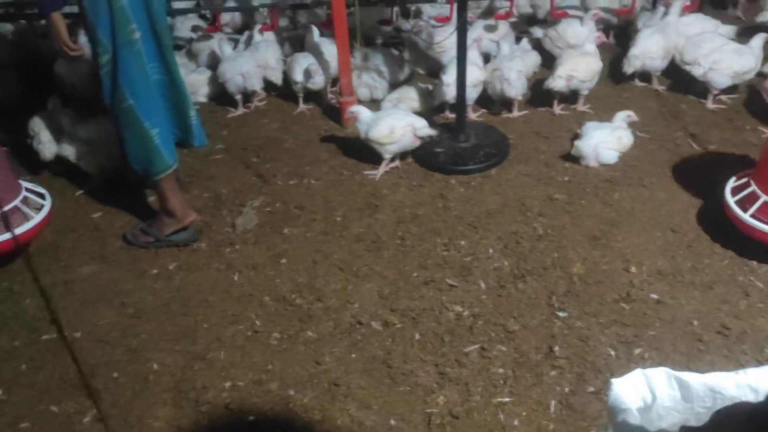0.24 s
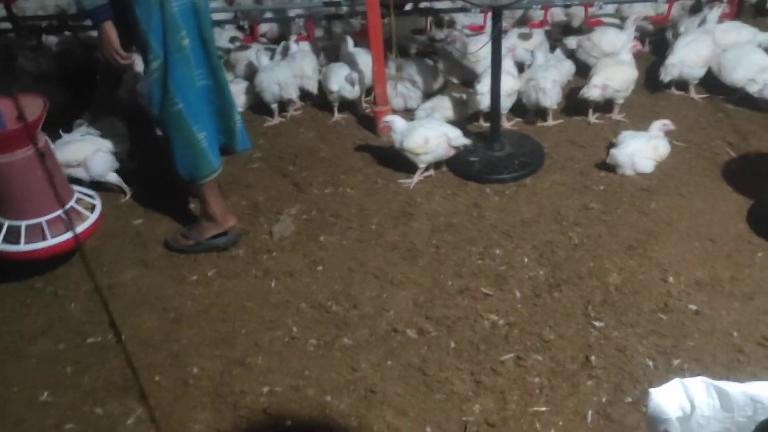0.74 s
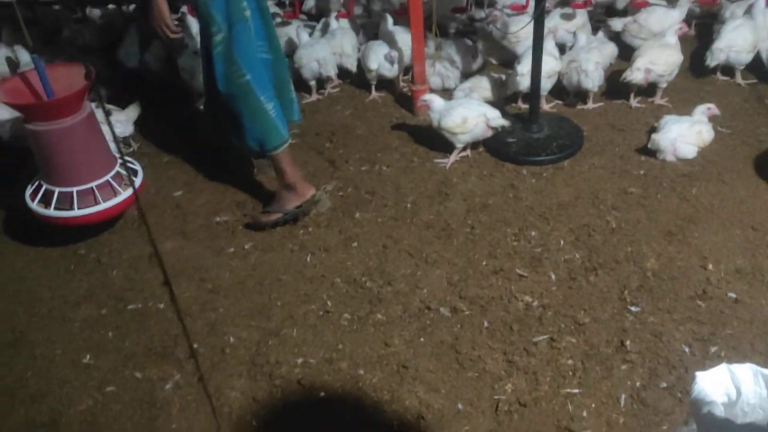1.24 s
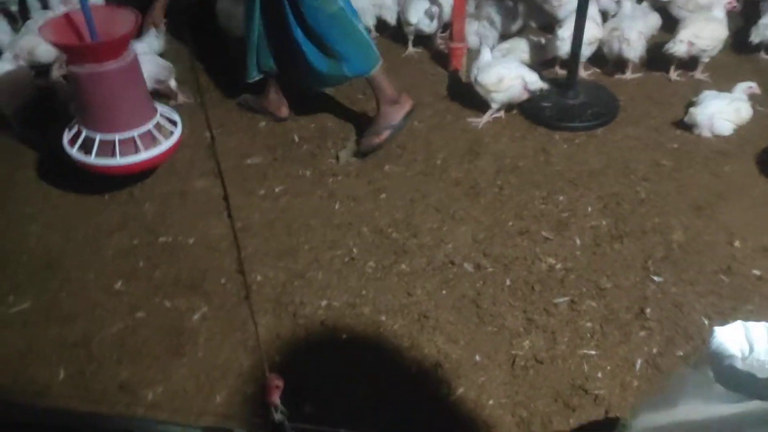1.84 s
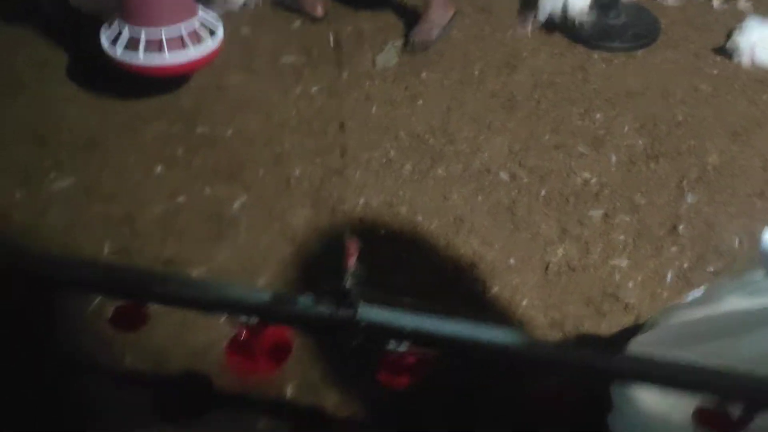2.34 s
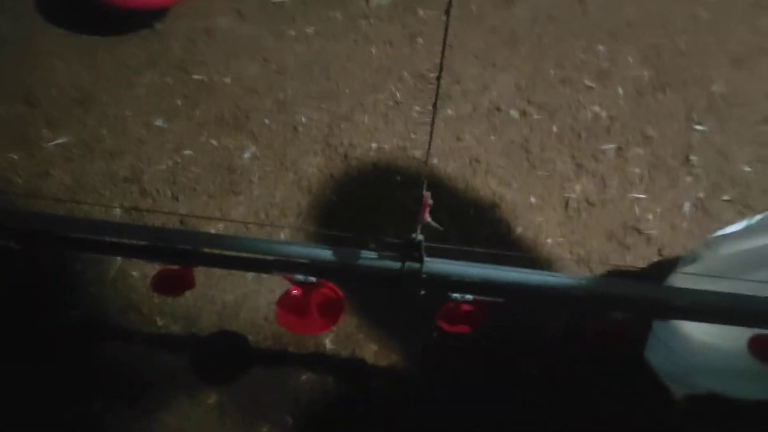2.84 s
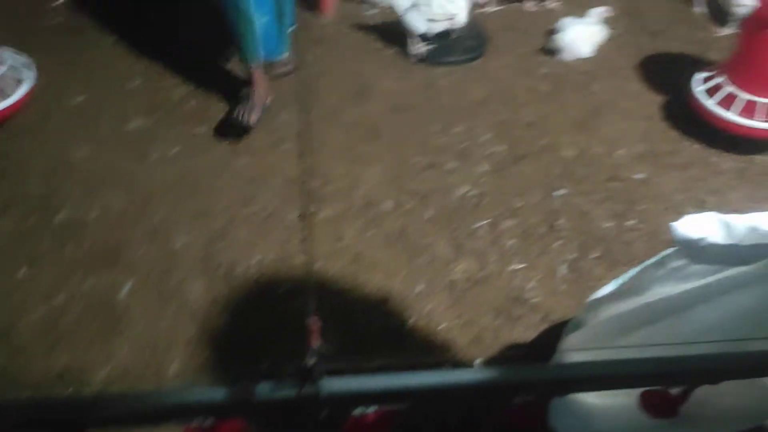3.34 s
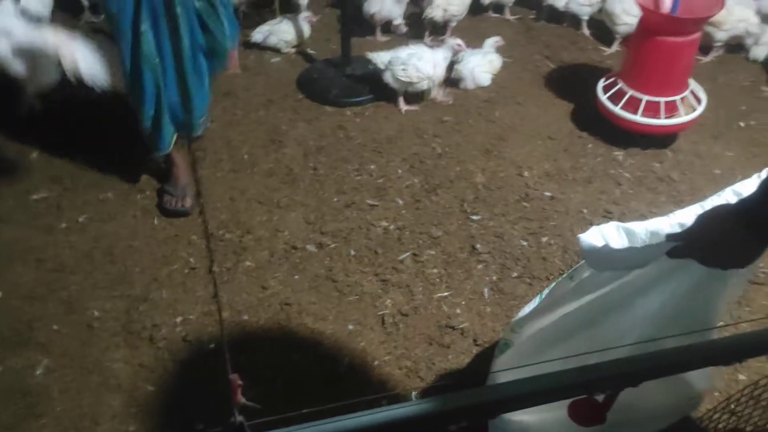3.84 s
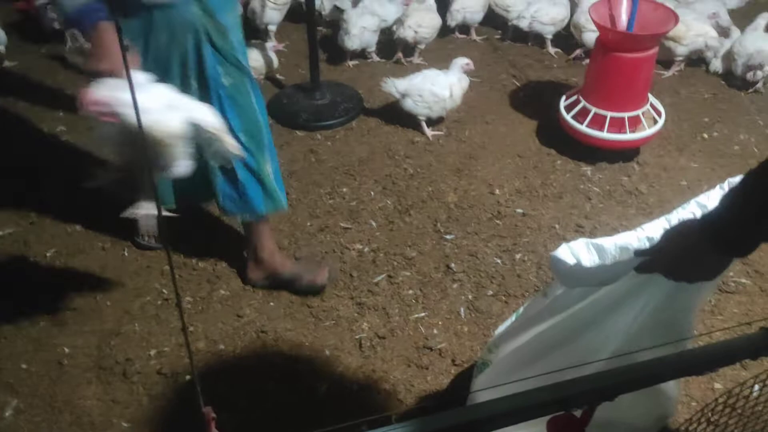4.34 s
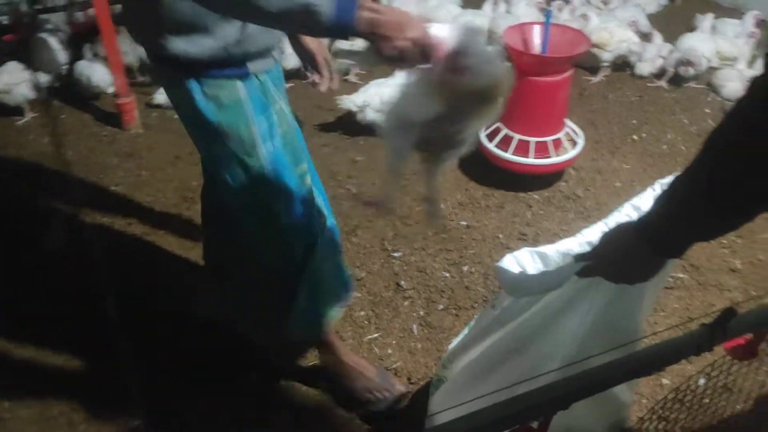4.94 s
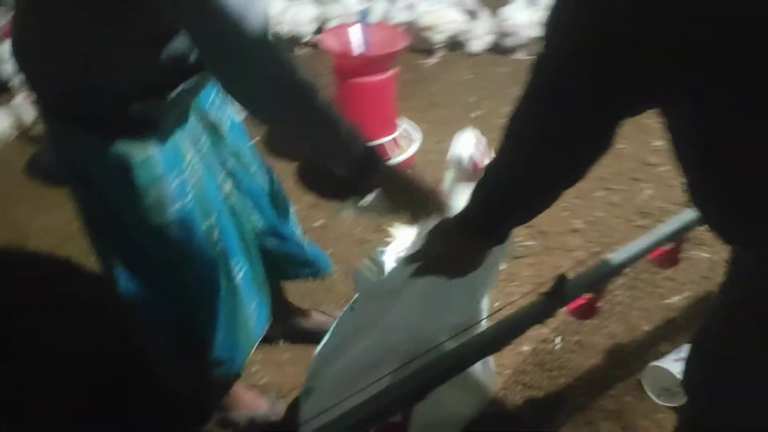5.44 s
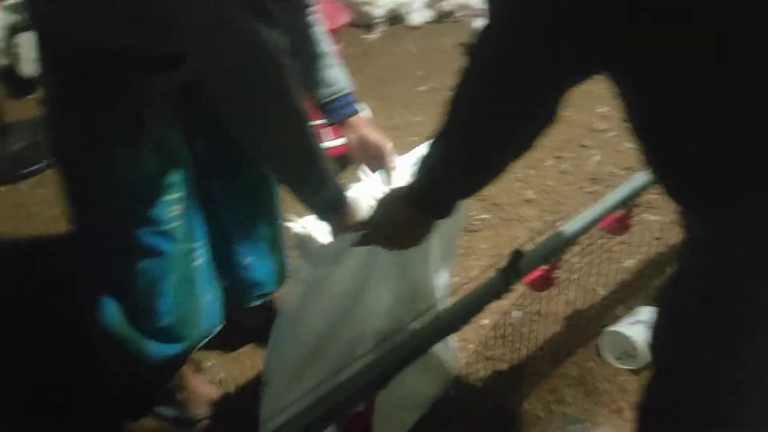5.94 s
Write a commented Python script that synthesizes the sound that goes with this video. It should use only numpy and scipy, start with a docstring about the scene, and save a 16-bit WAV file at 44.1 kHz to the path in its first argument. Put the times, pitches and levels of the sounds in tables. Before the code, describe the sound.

Short throaty chicken clucks and a few scuffing footsteps lead into loud, strained squawks near the microphone, with soft flock murmurs and hiss behind.

```python
"""Against a murmuring, peeping flock and a thin hiss under a low roof, a caught broiler clucks: a pulsed
syrinx source through throat and beak resonances. Puffs of air, dry rustles and a few footfalls (shaped noise,
falling sines) pass meanwhile. Carried up to a sack near the microphone, the bird then gives long squawks that
start as a rasp, lock into a clear tone and sag as the beak closes; a rustle and a last short cluck end it."""
import sys
import numpy as np
from scipy import signal
from scipy.fft import rfft, irfft
from scipy.io import wavfile

SR = 44100
rng = np.random.default_rng(int(sys.argv[2]) if len(sys.argv) > 2 else 0)


def master(y):
    """Save y as 16-bit WAV."""
    cut = np.clip(np.atleast_2d(y).T, -1, 1)
    pcm = np.round(cut * 32767)  # scale
    wavfile.write(sys.argv[1], SR, pcm.astype(np.int16))


N = 273420


def undb(db):
    """Decibels to gain."""
    return 10 ** (np.asarray(db) / 20)


def unit(x):
    """Scale to rms 1."""
    return x / np.sqrt(np.mean(x ** 2) + 1e-18)


def add(out, start_s, x):
    """Mix x into out from a start time on."""
    i = max(int(start_s * SR), 0)
    out[i:i + len(x)] += x[:max(len(out) - i, 0)]


def colour(points, hz):
    """Gain of a (Hz, dB) spectrum at the given frequencies."""
    f, db = np.transpose(points)
    return undb(np.interp(np.log(hz + 1), np.log(f), db))


def hump(hz, centre_hz, octaves):
    """Bell shape on a log-frequency axis, 1 at the centre."""
    return np.exp(-.5 * (np.log2((hz + 1) / centre_hz) / octaves) ** 2)


def band_noise(n, centre_hz, octaves):
    """Noise around one frequency, rms 1."""
    spectrum = rfft(rng.standard_normal(n))
    return unit(irfft(spectrum * hump(np.fft.rfftfreq(n, 1 / SR), centre_hz, octaves), n))


def walk(n, rate_hz):
    """Smooth chance with a spread near 1 that turns about rate_hz times a second."""
    steps = np.arange(n) * rate_hz / SR
    count = int(steps[-1]) + 2
    return 1.2207 * np.interp(steps, np.arange(count), rng.standard_normal(count))


def gate(t, start_s, end_s, attack_s, release_s):
    """Opens linearly at the start and dies away exponentially after the end."""
    return np.clip((t - start_s) / attack_s, 0, 1) * np.exp(-np.maximum(t - end_s, 0) / release_s)


def background(flicker_db=2, left_db=-1, level_db=-46):
    """Distant flock, rustle and hiss: half-octave noise bands that flicker, the treble least."""
    # Spectrum of the shed's background. Each row: frequency in Hz, relative density in dB per Hz.
    shed_colour = [(30, 3.5), (105, -14.5), (180, -1.5), (720, -7), (1000, -1.5), (1650, -7), (2350, -5.5),
                   (3300, -9), (6000, -16.5), (7100, -2), (8700, -9), (10200, -33.5), (15000, -29.5)]
    f, out = np.fft.rfftfreq(N, 1 / SR), np.zeros((2, N))
    # part of the noise is common to both channels
    noise = rng.standard_normal((2, N)) + 0.63 * rng.standard_normal(N)
    noise = rfft(noise) * colour(shed_colour, f)
    for hz in 30 * 2 ** (np.arange(19) / 2):
        band = irfft(noise * hump(f, hz, 1 / 4), N)
        out += band * undb(flicker_db * min(1, 3000 / hz) * walk(N, 14))
    return unit(out) * undb(level_db + np.array([[left_db], [-left_db]]) / 2)


def soft_call(length_s, first_hz, last_hz, waver=0.0412, overtone_db=-17):
    """A wavering glide with one strong partial and a weak octave."""
    n = int(length_s * SR)
    hz = np.geomspace(first_hz, last_hz, n) * (1 + waver * walk(n, 319.6))
    phase = 2 * np.pi * np.cumsum(hz) / SR
    return unit((np.sin(phase) + undb(overtone_db) * np.sin(2 * phase)) * np.hanning(n) ** .5)


def flock(length_s=0.0651, murmur_db=-49.0, peep_db=-58, count=110):
    """A few distinct calls over many random murmurs and peeps, all gliding tones."""
    # Other birds' calls. Each row: start in seconds, first pitch in Hz, last pitch in Hz, level before room in dB.
    distinct_calls = [(.59, 2590, 1980, -59), (1.498, 1577, 1850, -46), (.73, 1022, 904, -48),
                      (1.14, 2270, 1820, -50.5), (3.745, 1025, 917, -37), (4.109, 1126, 1055, -44),
                      (4.181, 2780, 2250, -58)]
    out = np.zeros(N)
    for start_s, first_hz, last_hz, db in distinct_calls:
        add(out, start_s, undb(db) * soft_call(length_s, first_hz, last_hz))
    for centre_hz, level_db in [(1020, murmur_db), (2250, peep_db)]:
        for turn, (when, size, pitch, loud) in enumerate(rng.random((count, 4))):
            start_s = (turn + 2 * when - 1) / count * N / SR
            hz = centre_hz * 2 ** (.5 * (pitch - .5))
            call = soft_call(length_s * (.5 + size), hz * 1.07, hz / 1.07)
            add(out, start_s, undb(level_db + 10 * (loud - .5)) * call)
    return out


def litter(centre_hz=6500, grain_db=5, scratch_db=-57, count=45):
    """Dry husks crackle: a few clear rustles over the scratching of many feet, as grainy noise."""
    # Rustles of litter and sack. Each row: start in seconds, length in seconds, level before room in dB.
    rustles = [(0.334, 0.018, -55), (1.5, .04, -45.5), (6.144, 0.006, -40)]
    out, t = np.zeros(N), np.arange(SR // 8) / SR
    scratches = [(when * N / SR, 0.032 * size, scratch_db + 10 * (loud - .5))
                 for when, size, loud in rng.random((count, 3))]
    for start_s, length_s, db in list(rustles) + scratches:
        grains = unit(band_noise(len(t), centre_hz, 0.38) * undb(grain_db * walk(len(t), 600)))
        add(out, start_s, undb(db) * grains * gate(t, 0, length_s, attack_s=.003, release_s=0.0096))
    return out


def puffs(right_db=-14):
    """Air brushing the left microphone port: short low rumbles, faint on the right."""
    # Each row: start in seconds, length in seconds, left level in dB.
    air_puffs = [(0.1, 0.065, -34), (2.122, 0.29, -48.5)]
    out = np.zeros(N)
    for start_s, length_s, db in air_puffs:
        n = int(length_s * SR)
        add(out, start_s, undb(db) * band_noise(n, 34.0, 1.56) * np.hanning(n) ** .5)
    return np.array([out, undb(right_db) * out])


def footfalls(thud_hz=205, bend=1.0, bend_s=0.0044, thud_s=0.0093, scuff_s=0.015, grit_db=3):
    """Sandals land on the packed litter with a hollow thud that drops in pitch, and scrape over it."""
    # Each row: start in seconds, relative thud level in dB, scuff centre in Hz, relative scuff level in dB.
    steps = [(0.916, -59, 430, -49.5), (1.925, -48, 500, -56), (2.287, -34.5, 890, -35.5),
             (2.797, -36, 580, -40), (3.482, -37.5, 1060, -36.5)]
    out, t = np.zeros(N), np.arange(SR // 6) / SR
    for start_s, thud_db, scuff_hz, scuff_db in steps:
        thud = np.sin(2 * np.pi * np.cumsum(thud_hz * (1 + bend * np.exp(-t / bend_s))) / SR)
        scuff = band_noise(len(t), scuff_hz, 0.59) * undb(grit_db * walk(len(t), 330))
        for sound, db, decay_s in [(thud, thud_db, thud_s), (scuff, scuff_db, scuff_s)]:
            add(out, start_s, undb(db) * sound * gate(t, 0, 0.015, attack_s=0.0034, release_s=decay_s))
    return out


def shed(x, near_db, far_db, near_s=0.011, t60_s=0.27, treble_t60_s=0.36):
    """Floor, feeders and bodies scatter the sound at once; roof and walls give a short tail."""
    t = np.arange(int(.7 * SR)) / SR
    # small things scatter short waves most
    near_highpass = signal.butter(4, 1400, "highpass", fs=SR, output="sos")
    far_lowpass = signal.butter(2, 3000, fs=SR, output="sos")
    ears = []
    for _ in range(2):
        near, far = rng.standard_normal((2, len(t)))
        near = signal.sosfilt(near_highpass, near * np.exp(-t / near_s) * (t > .0007))
        low = signal.sosfilt(far_lowpass, far)
        tail = low * 1000 ** (-t / t60_s) + 0.5 * (far - low) * 1000 ** (-t / treble_t60_s)
        tail = tail * (t > .012)
        response = (undb(near_db) * unit(near) + undb(far_db) * unit(tail)) / np.sqrt(len(t))
        ears.append(signal.fftconvolve(x, response)[:N])
    return np.array(ears)


def syrinx(hz, rasp, doubling=0.21, waver=0.00553, rough_waver=0.03415, jitter=.125, beat_db=4.0,
           shimmer_db=2.5, gating=0.88, dispersion=0.292, air_share=0.71):
    """Membranes beat regularly, alternate strong and weak or break into chaos; air escapes once a cycle."""
    n = len(hz)
    drift = (waver + rough_waver * rasp) * walk(n, 111.1) + jitter * rasp ** 1.678 * walk(n, 450)
    phase = 2 * np.pi * np.cumsum(hz * (1 + drift)) / SR
    k = np.arange(1, 27)[:, None]
    # the windpipe spreads each beat out in time
    tone = (np.cos(k * phase - dispersion * k ** 2) * (k * hz < SR / 2)).sum(0)
    tone = unit(tone * (1 + 2 * doubling * np.sqrt(rasp) * np.cos(phase / 2)))
    air = unit(rng.standard_normal(n) * (1 + gating * np.cos(phase)))
    leak = np.clip(air_share * rasp, 0, 1)
    # in chaos every beat has its own strength and beats come in uneven bursts; the air pulses with them
    beats = np.interp(phase / (2 * np.pi), np.arange(n), rng.standard_normal(n))
    uneven_db = rasp * (beat_db * (beats - .5) + shimmer_db * (walk(n, 258.0) - .5))
    return (np.sqrt(1 - leak ** 2) * tone + leak * air) * undb(uneven_db)


def voice(t, hz, rasp, low_db, middle_db, top_db, second_db, opened, open_hz, beak_hz, throat_db,
          throat_octaves, pitch_ring_db=10, twist_db=3.5):
    """Syrinx through throat and beak resonances that follow the gape; effort weights three registers."""
    # Colours of the clear and of the rasping voice. Each row: frequency in Hz, relative level in dB.
    clear_colour = [(100, -69), (430, -2), (600, 2.5), (950, -6), (1300, -1), (1900, -1.5), (2600, 5),
                    (3300, 1.5), (3850, 9), (4500, -9), (5500, -9), (8800, -13.5), (10600, -41),
                    (15000, -49)]
    rasp_colour = [(100, -48), (480, 1.5), (760, 5.5), (1120, 12), (1750, -6), (3000, -6.5), (3750, -8.5),
                   (4900, -13), (7300, 5.5), (9000, 1), (10500, -22), (15000, -29.5)]
    shut_hz, beak_ref_hz, beak_swing = 1150, 7684, 0.08
    rasp = np.clip(rasp, 0, 1)
    f, frames_s, source = signal.stft(syrinx(hz, rasp), SR, nperseg=384)
    controls = (hz, rasp, low_db, middle_db, top_db, second_db, opened, throat_db, throat_octaves)
    hz, rasp, low_db, middle_db, top_db, second_db, opened, throat_db, throat_octaves = (
        np.interp(frames_s, t - t[0], c + 0 * t) for c in controls)
    f = f[:, None]
    above_low, above_middle = (1 / (1 + (edge_hz / (f + 1)) ** 16) for edge_hz in (1600, 4800))
    # the treble colour slides with the beak resonance
    beak_now_hz = beak_hz * (1 - beak_swing * (1 - opened))
    slid_hz = f * (beak_ref_hz / beak_now_hz) ** above_middle
    tract = colour(clear_colour, slid_hz) ** (1 - rasp) * colour(rasp_colour, slid_hz) ** rasp
    throat_hz = shut_hz + (open_hz - shut_hz) * opened
    tract = tract * undb(throat_db * hump(f, throat_hz, throat_octaves))
    # even in chaos the membranes favour their own frequency
    ring_db = pitch_ring_db * (1 + rasp) / 2 * hump(f, hz, .15)
    tract = tract * undb(second_db * hump(f, 2 * hz, .15) + ring_db)
    # the struggling bird twists its neck, so partials swell and fade unevenly
    smoother = np.outer(np.hanning(8), np.hanning(12))
    twist = unit(signal.fftconvolve(rng.standard_normal(tract.shape), smoother, "same"))
    tract = tract * undb(twist_db * twist)
    registers = [(1 - above_low, low_db), (above_low - above_middle, middle_db), (above_middle, top_db)]
    gain = sum(share * undb(db) / np.sqrt(np.mean((share * tract) ** 2, axis=0)) for share, db in registers)
    return signal.istft(source * tract * gain, SR)[1][:len(t)]


def gape(t, widest_s, length_s, snap_s=0.023, snap_share=0.78):
    """Beak opening, 0-1: snaps most of the way open, widens on to widest_s, then shuts."""
    opens = snap_share * (1 - np.exp(-t / snap_s)) + (1 - snap_share) * np.minimum(t / widest_s, 1)
    shutting = np.clip((t - widest_s) / (length_s - widest_s), 0, 1)
    return opens * (.5 + .5 * np.cos(np.pi * shutting))


def catch(centre_hz, attack_s=0.0065, hold_s=0.012, release_s=0.018, db=-4.0):
    """The short, hollow puff with which the throat opens: narrow-band noise."""
    t = np.arange(SR // 10) / SR
    return undb(db) * band_noise(len(t), centre_hz, 1 / 5) * gate(t, 0, hold_s, attack_s, release_s)


def clucks(fall=0.17, closing_share=.35, strain=.08, strain_s=0.01035, lock_share=.35, shortest_s=.045,
           onset_rasp=0.708, end_rasp=0.26, top_slope=1.78, top_db=-2.0, opening_db=-7, opening_low_db=-11,
           closing_db=-6, closing_low_db=-3, attack_share=0.1, release_s=0.013, widest_share=0.52,
           throat_db=8, throat_octaves=0.34, beak_hz=7900, catch_db=2.5, catch_hz=900,
           catch_hz_per_s=7000, catch_db_per_s=90):
    """A hoarse catch locks into a tone that drops onto its pitch, then bends down as the beak shuts."""
    # Each row: start in seconds, length in seconds, pitch in Hz, rasp 0-1, low register in dB,
    # second partial lift in dB, brightness in dB, open throat resonance in Hz.
    short_calls = [(0.137, 0.041, 523.4, 0.57, -31, 3, -10, 1520),
                   (0.423, 0.047, 512.6, 0.61, -26.5, 4, -15, 1030),
                   (0.821, 0.06, 694, 0.97, -37, -3, -17, 1800),
                   (0.969, 0.048, 773, 0.5, -34, -14, -10.5, 2020),
                   (1.11, 0.04, 738.6, 0.32, -31, -14, -11, 1710),
                   (1.219, 0.052, 677.4, 0.41, -27.5, -8, -11.5, 1270),
                   (1.402, 0.05, 642.6, 0.25, -28, -4, -6.5, 1670),
                   (1.556, 0.06, 660, 0.35, -27.5, 1, -1, 1950), (1.703, 0.085, 695, 0.6, -26, 7, 0, 1720),
                   (1.885, 0.082, 681, 0.65, -26, 12, -1.5, 2560),
                   (2.002, 0.074, 524, 0.77, -30, 1.5, -5, 2420),
                   (2.118, 0.068, 656.6, 0.2, -23.5, 15, -10.5, 2100),
                   (2.319, 0.051, 667.4, 0.5, -25, 14, -5, 1960),
                   (2.46, 0.118, 660, 0.08, -30, 13, -0.5, 2660),
                   (2.651, 0.12, 636.7, 0.32, -31.5, 2, 3, 3140),
                   (2.847, 0.11, 641.5, 0.18, -29, 6.5, -1, 2680),
                   (3.045, 0.12, 662.6, 0.11, -27, -2.5, -2, 2500),
                   (3.263, 0.13, 632, 0.16, -28, 1.5, -0.5, 2600),
                   (3.407, 0.092, 608.6, 0.66, -30.5, 2.5, -1, 1930),
                   (6.165, 0.046, 569, 0.57, -27, -15, -4, 1240)]
    out = np.zeros(N)
    for start_s, length_s, pitch_hz, rasp, low_db, second_db, bright_db, open_hz in short_calls:
        t = np.arange(int((length_s + .04) * SR)) / SR
        # the longer the cluck, the higher and softer its catch and the later its tone
        extra_s = max(length_s - shortest_s, 0)
        since_lock_s = t - lock_share * extra_s
        opening = 1 / (1 + np.exp(since_lock_s / .004))
        closing = np.clip(1 - (length_s - t) / (closing_share * length_s), 0, 1)
        strained = strain * np.exp(-np.maximum(since_lock_s, 0) / strain_s)
        hz = pitch_hz * (1 + strained - fall * closing ** 2)
        # the voice slips in and out of chaos
        slip = rasp * (.9 + walk(len(t), 70) / 3)
        narrowed_db = opening_db * opening + closing_db * closing
        call = voice(t, hz, rasp=slip + onset_rasp * opening + end_rasp * closing ** 2,
                     low_db=low_db + opening_low_db * opening + closing_low_db * closing ** 2,
                     middle_db=low_db + bright_db + narrowed_db,
                     top_db=low_db + top_db + top_slope * bright_db + 2 * narrowed_db, second_db=second_db,
                     opened=gape(t, widest_share * length_s, length_s + release_s), open_hz=open_hz,
                     beak_hz=beak_hz, throat_db=throat_db, throat_octaves=throat_octaves)
        add(out, start_s, call * gate(t, 0, length_s, attack_share * length_s, release_s))
        puff_gain = undb(low_db + catch_db - catch_db_per_s * extra_s)
        add(out, start_s, puff_gain * catch(catch_hz + catch_hz_per_s * extra_s))
    return out


def squawk(length_s, crest_s, strained_hz, held_hz, rasp, burst_db, rasp_db, crest_db, low_db, treble_db,
           second_db, open_hz, beak_hz, attack_s=0.017, release_s=0.0081, opening_s=.016, opening_db=-7,
           rasp_low_db=-2.0, rasp_throat_db=10.5, clear_throat_db=6, tight_octaves=0.11, slack_octaves=0.58):
    """A burst of rasp that locks into a tone, swells, brightens with effort and sags as the beak closes."""
    # the voice locks into a clear tone shortly before the crest
    lock_lead_s, lock_s, clear_rasp = 0.0434, 0.0108, 0.044
    # pitch starts low, is strained while the voice rasps, then relaxes to a held note that sags a little
    opening_drop_hz, relax_s, relax_lead_s, sag_hz_per_s = 91.2, .075, 0.04, 150
    # effort: an opening burst, a rasping stretch, a swell to the crest and an easing after it
    burst_s, swell_s, ease_s, burst_treble_db = 0.034, 0.042, 0.12, -14
    # dB gained per dB of effort; before the other lifts the treble equals the middle at even_db
    treble_slope, low_slope, even_db = 1.96, 0.47, -24
    # as the beak closes the pitch drops, the voice roughens and its weight moves down
    closing_s, closing_drop_hz, closing_rasp = .05, 100.5, 0.44
    closing_low_db, closing_middle_db, closing_treble_db = 2.5, -5.5, -21.5
    widest_lead_s = 0.028

    t = np.arange(int((length_s + .04) * SR)) / SR
    late_s = t - crest_s
    swell = np.exp(-.5 * (late_s / np.where(late_s < 0, swell_s, ease_s)) ** 2)
    chaos = 1 / (1 + np.exp((late_s + lock_lead_s) / lock_s))
    strain = np.clip(-(late_s + relax_lead_s) / relax_s, 0, 1)
    opening, burst = np.exp(-t / opening_s), np.exp(-.5 * (t / burst_s) ** 2)
    closing = np.clip(1 - (length_s - t) / closing_s, 0, 1)
    effort_db = rasp_db + (crest_db - rasp_db) * swell + burst_db * burst
    hz = (held_hz + (strained_hz - held_hz) * strain - sag_hz_per_s * np.maximum(late_s, 0)
          - opening_drop_hz * opening - closing_drop_hz * closing ** 2)
    low = (low_db + low_slope * (effort_db - crest_db) + rasp_low_db * chaos + opening_db * opening
           + closing_low_db * np.sin(np.pi * closing ** 2))
    top = (even_db + treble_slope * (effort_db - even_db) + treble_db * swell
           + burst_treble_db * np.exp(-t / burst_s) + closing_treble_db * closing)
    call = voice(t, hz,
                 rasp=clear_rasp + (rasp - clear_rasp) * chaos + closing_rasp * (closing ** 2 + opening),
                 low_db=low, middle_db=effort_db + opening_db * opening + closing_middle_db * closing,
                 top_db=top, second_db=second_db * (1 - chaos),
                 opened=gape(t, crest_s - widest_lead_s, length_s + 2 * release_s),
                 open_hz=open_hz, beak_hz=beak_hz,
                 throat_db=clear_throat_db + (rasp_throat_db - clear_throat_db) * (chaos + closing),
                 # broad at both ends of the call, narrow while the bird strains
                 throat_octaves=tight_octaves + (slack_octaves - tight_octaves) * np.maximum(burst, closing))
    return call * gate(t, 0, length_s, attack_s, release_s)


def squawks(catch_hz=1280):
    """The long calls of the carried bird, each opened by a catch of the throat."""
    # Each row: start in seconds, time to the crest in seconds, length in seconds, strained pitch in Hz,
    # held pitch in Hz, rasp 0-1, opening burst in dB, rasp level in dB, crest level in dB, low register in dB,
    # treble lift in dB, second partial lift in dB, open throat resonance in Hz, beak resonance in Hz,
    # relative catch level in dB.
    long_calls = [(3.516, 0.11, 0.2, 747.3, 677, 0.75, 1, -25, -26.5, -28.5, 2.5, -5.5, 2970, 7400, -21.5),
                  (3.835, 0.2, 0.24, 743, 669.5, 0.73, 3, -25.5, -23.5, -30, 4.5, -0.5, 3120, 7560, -26),
                  (4.243, 0.2, 0.24, 831, 639.3, 0.94, 8.5, -31.5, -23, -28.5, 9.5, 6, 3000, 7600, -22),
                  (4.707, 0.22, 0.27, 775, 632.8, 0.85, 10.5, -28, -19, -25.5, 1.5, 9, 2990, 7700, -24),
                  (5.172, .18, .245, 698.5, 632.6, .72, 5.5, -22.5, -20.5, -26.5, 1.5, 4, 3120, 8100, -20),
                  (5.57, 0.12, 0.17, 700, 649, 0.64, 8, -27.5, -26, -24, 11.5, 4, 2420, 7430, -17),
                  (5.883, 0.11, .16, 623, 651.2, 0.52, 5, -25, -26, -24, 15, 1, 1940, 7570, -28)]
    out = np.zeros(N)
    for start_s, crest_s, length_s, *manner, catch_db in long_calls:
        add(out, start_s, squawk(length_s, crest_s, *manner))
        add(out, start_s - .002, undb(catch_db) * catch(catch_hz))
    return out


def scene():
    """The caught bird, direct and in the room, shifts its place; flock and feet come through the room."""
    # Place of the bird. Each row: time in seconds, left minus right in dB, lag of the left port in ms,
    # extra room sound in dB.
    place = [(.4, 1.5, 0.2, -1), (3.301, -1.5, .25, 3), (5.2, -.5, -0.028, 0), (6.004, -0.5, 0.076, -3)]
    t = np.arange(N) / SR
    place_s, *columns = np.transpose(place)
    pan_db, lag_ms, room_db = (np.interp(t, place_s, c) for c in columns)
    bird, others, feet = clucks() + squawks(), flock(), footfalls()
    direct = np.array([np.interp(t - lag_ms / 1000, t, bird), bird])
    bird_room = shed(bird * undb(room_db), near_db=-1.5, far_db=-12.5)
    caught = (undb(-5.5) * direct + bird_room) * undb(np.array([pan_db, -pan_db]) / 2)
    around = undb(4) * feet + shed(others + undb(2.5) * feet, near_db=10.0, far_db=-6.0)
    around = around + shed(litter(), near_db=7.0, far_db=-31)
    return caught + around + puffs() + background()


def record(dry, top_hz=15700):
    """The phone's two ports colour the sound differently; the top is cut."""
    # Left port's pickup over the right's. Each row: frequency in Hz, difference in dB.
    ports = [(100, 10.5), (600, 8), (1500, 6.5), (3000, 5), (6000, 0), (8600, 5), (13000, 1.5)]
    tilt = colour(ports, np.fft.rfftfreq(N, 1 / SR)) ** .5
    heard = irfft(rfft(dry) * np.array([tilt, 1 / tilt]), N)
    return signal.sosfilt(signal.ellip(8, .2, 70, top_hz, fs=SR, output="sos"), heard)


dry = scene()
out = record(dry)
master(out)
```